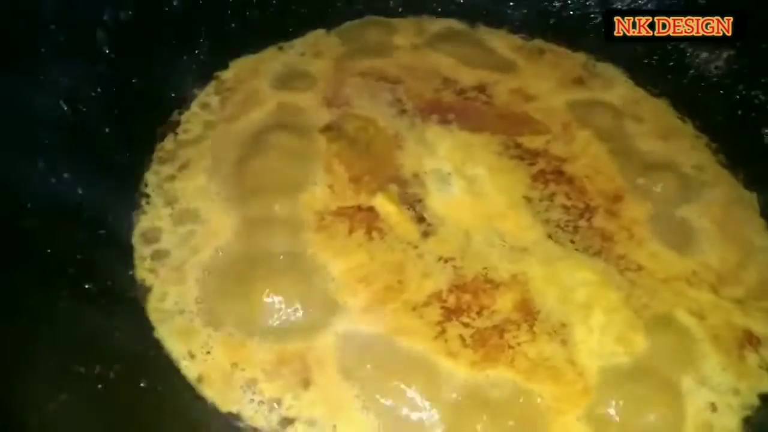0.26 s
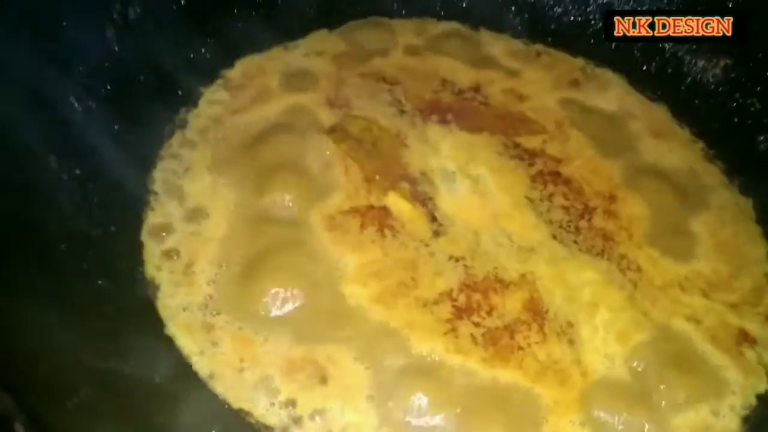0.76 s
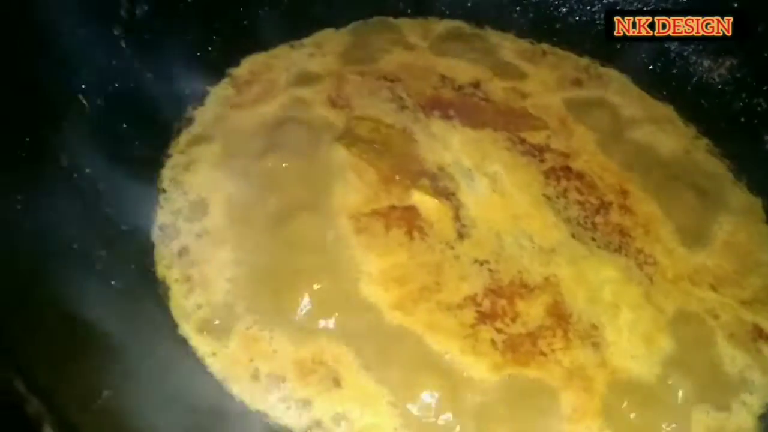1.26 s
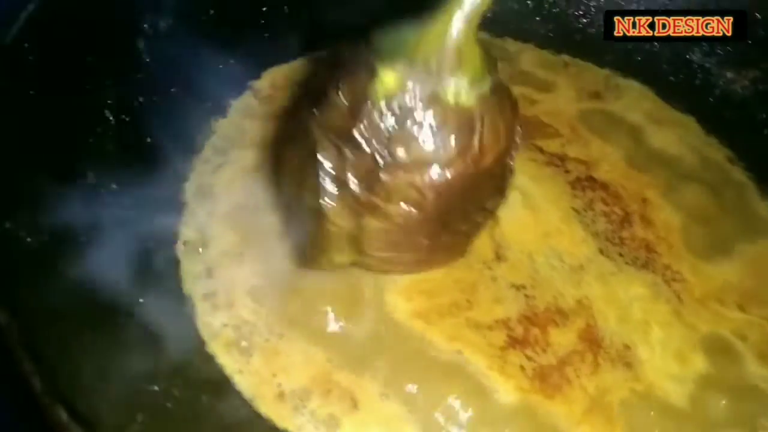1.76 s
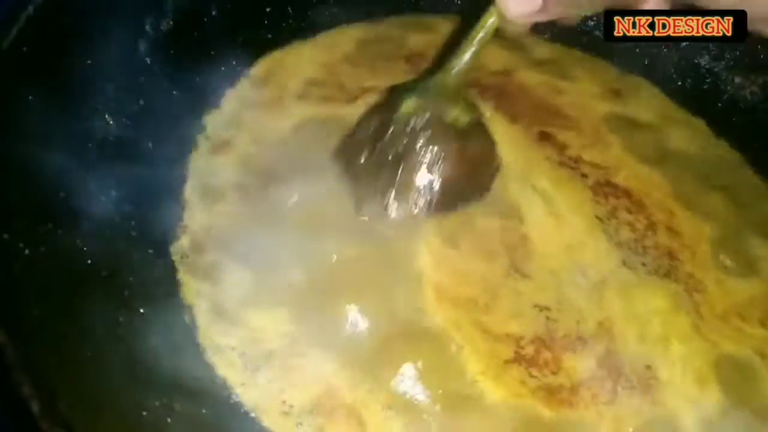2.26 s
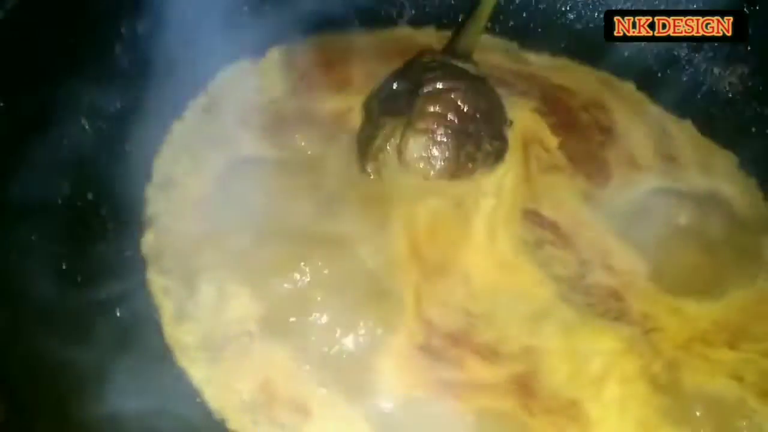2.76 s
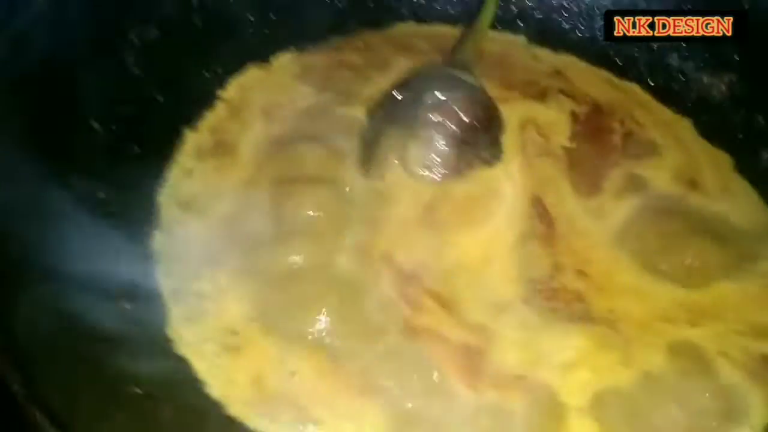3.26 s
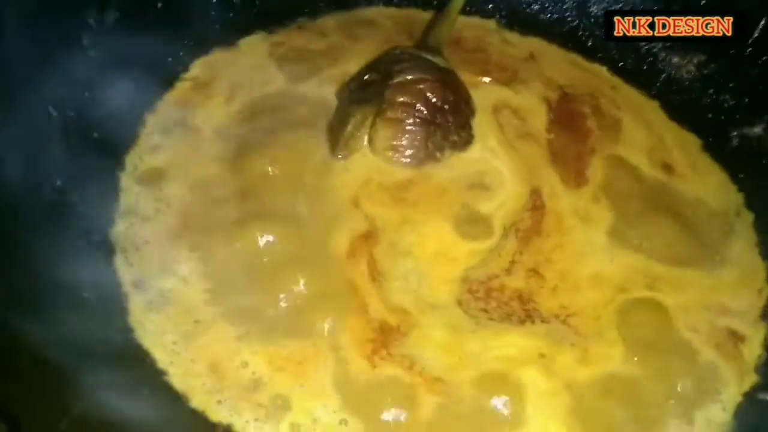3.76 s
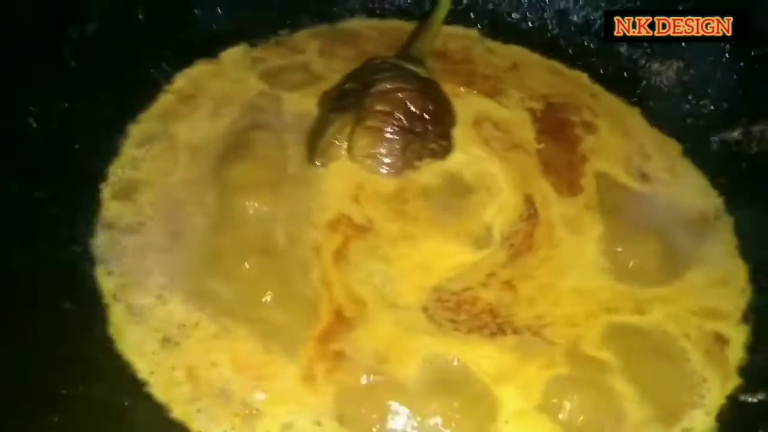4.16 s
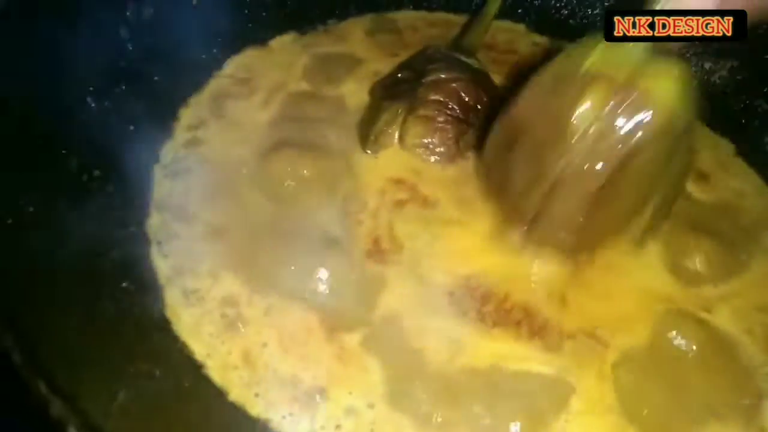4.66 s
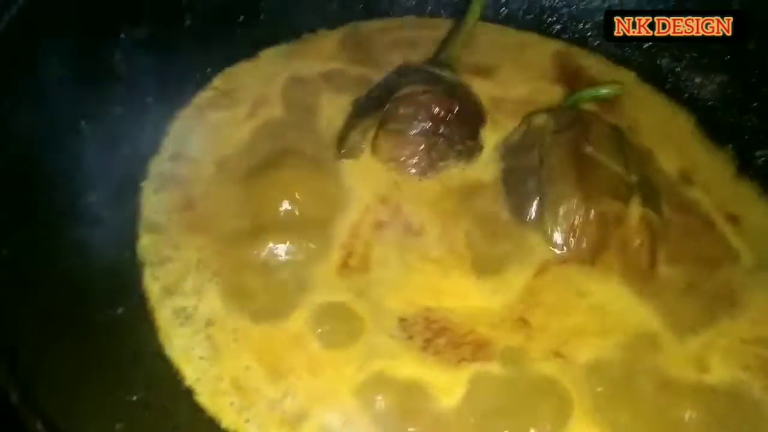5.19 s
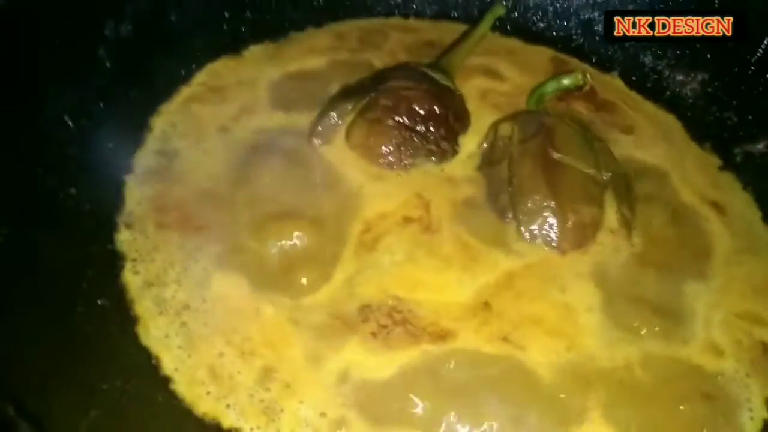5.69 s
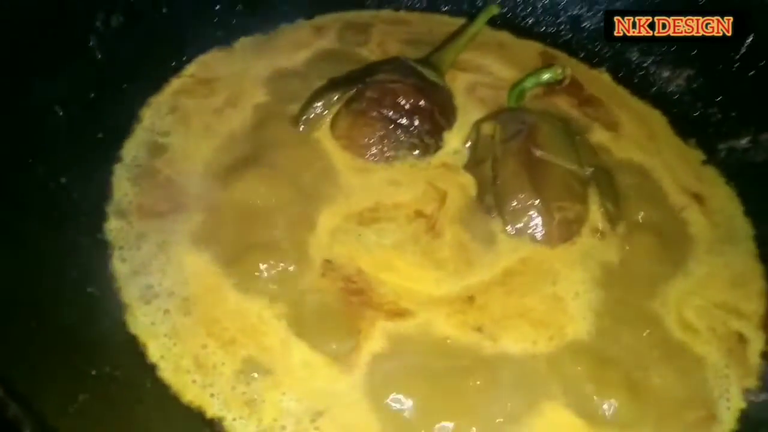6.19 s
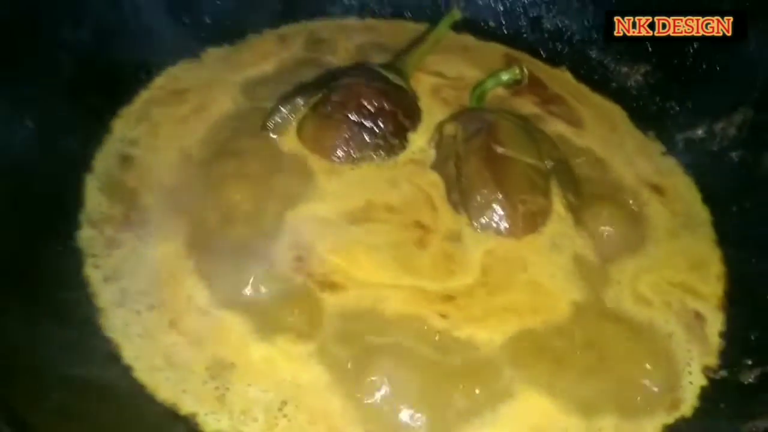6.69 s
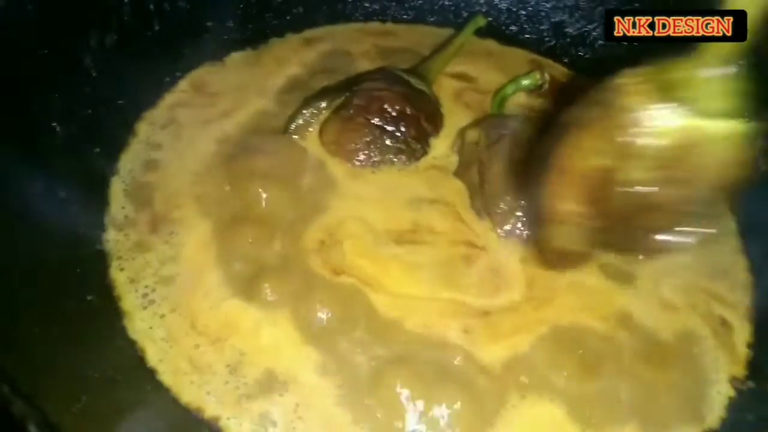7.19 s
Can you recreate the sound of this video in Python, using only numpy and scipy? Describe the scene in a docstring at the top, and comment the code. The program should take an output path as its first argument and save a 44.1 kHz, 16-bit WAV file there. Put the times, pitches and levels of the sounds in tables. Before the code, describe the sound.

Thick curry bubbles, plops and sizzles in a pan, with sharp oil spits and steady dull pounding from another room.

```python
"""Curry simmering in a wide pan

Close up, steam gurgles and plops through thick gravy while oil sizzles and spits at the rim. The boil
slackens once a first aubergine has sunk in; a second lands with a wet slap and a rush of froth.
Elsewhere in the house steady pounding, as of a mortar and pestle, thuds through the floor, and later
a low rumble like a rolling grinding stone joins in."""
import sys
import numpy as np
from scipy import signal
from scipy.fft import rfft, irfft
from scipy.io import wavfile
from scipy.ndimage import uniform_filter1d

SR = 44100
rng = np.random.default_rng(int(sys.argv[2]) if len(sys.argv) > 2 else 0)


def persist_wave(psi):
    """Save psi, clipped to +-1, as 16-bit WAV."""
    counts = np.round(np.clip(psi, -1, 1) * 32767).astype(np.int16)
    wavfile.write(sys.argv[1], SR, np.atleast_2d(counts).T)


N = 328104
TIME = np.arange(N) / SR
# the aubergine lands and settles: start_s, peak_db
SLAP_HITS = [(5.3335, -26), (5.3454, -36), (5.3562, -35.5)]


def amp(db):
    """Decibels to gain."""
    return 10 ** (np.asarray(db) / 20)


def unit_rms(x):
    """Scales to rms 1."""
    return x / np.sqrt(np.mean(x ** 2) + 1e-20)


def unit_peak(x):
    """Scales to peak 1."""
    return x / (abs(x).max() + 1e-20)


def add(mix, start_s, sound):
    """Mixes a sound in at its start time."""
    part = mix[max(round(start_s * SR), 0):][:len(sound)]
    part += sound[:len(part)]


def eq(x, curve):
    """Minimum-phase EQ through points of freq_hz, gain_db."""
    size = 8192
    hz, db = np.transpose(curve)
    bin_hz = abs(np.fft.fftfreq(size, 1 / SR))
    log_gain = np.log(amp(np.interp(np.log(bin_hz + 1), np.log(hz + 1), db)))
    taps = np.fft.ifft(np.exp(np.conj(signal.hilbert(log_gain)))).real[:size // 2]
    return signal.oaconvolve(x, taps)[:len(x)]


def band(x, lo_hz, hi_hz, order=3):
    """Band-pass."""
    return signal.sosfilt(signal.butter(order, [lo_hz, hi_hz], "band", fs=SR, output="sos"), x)


def noise(samples, lo_hz, hi_hz, order):
    """A band of noise at rms 1."""
    return unit_rms(band(rng.standard_normal(samples), lo_hz, hi_hz, order))


def ring(t, hz, t60):
    """One dying mode."""
    return np.sin(2 * np.pi * hz * t) * np.exp(-np.log(1000) * t / t60)


def attack(t, rise_s):
    """An onset easing from 0 to 1."""
    return 1 - np.exp(-t / rise_s)


def swell(middle_s, length_s):
    """A smooth rise from 0 to 1 and back."""
    return np.cos(np.pi * np.clip((TIME - middle_s) / length_s, -.5, .5)) ** 2


def drift(rate_hz):
    """Smooth random wander of rms 1."""
    rolloff = 1 + (np.fft.rfftfreq(N, 1 / SR) / rate_hz) ** 2
    return unit_rms(irfft(rfft(rng.standard_normal(N)) / rolloff, N))


def reverb(x, t60):
    """Diffuse reflections that build up and die away."""
    t = np.arange(SR * 3 // 4) / SR
    tail = rng.choice([-1., 1.], len(t)) * np.exp(-np.log(1000) * t / t60) * attack(t, 0.037 * t60)
    return signal.oaconvolve(x, tail / np.linalg.norm(tail))[:N]


def room_tone():
    """A faint, dark bed of noise."""
    # spectrum of the quiet room: freq_hz, gain_db
    room_eq = [(20, -36), (60, 6.5), (105, 13), (170, 1), (350, -0.5), (600, -41), (1500, -58)]
    return amp(-77.5) * unit_rms(eq(rng.standard_normal(N), room_eq))


def grinding_stone():
    """Uneven stone rolling on stone shakes the floor in lumps, and grates when pushed hard."""
    # effort behind the stone: time_s, level_db
    effort = [(4.351, -66), (4.56, -43), (4.8, -40.5), (5.03, -44.5), (5.45, -38.5), (6.12, -41.5),
              (6.5, -47.5), (6.9, -41), (7.44, -45.5)]
    # the floor's low resonance: freq_hz, gain_db
    floor_eq = [(20, -80), (45, -16.5), (62, -15), (76, -7), (87, -12.5), (104, 7.5), (118, -5.5),
                (145, -9), (180, -18.5), (260, -35.5), (310, -45), (450, -53), (900, -103)]
    effort_db = np.interp(TIME, *np.transpose(effort), left=-120)
    rumble = unit_rms(eq(rng.standard_normal(N), floor_eq))
    rumble /= np.sqrt(uniform_filter1d(rumble ** 2, SR // 5) + 0.025)  # the stone's weight steadies it
    grit = amp(-23.5 + 3.5 * (effort_db - effort_db.max())) * noise(N, 275, 288, order=2)
    lumps_db = 1.8 * np.clip(drift(rate_hz=8), -2.5, 1.0)
    return amp(lumps_db + effort_db) * (rumble + grit)


def pounding():
    """Each blow thuds in the floor and knocks in the mortar; the house booms and clatters after it."""
    # pestle blows: start_s, thud_db, knock_db, clack_db
    blows = [(0.284, -33, -47, -70), (0.68, -36, -33, -54), (1.095, -34.5, -36.5, -48.5),
             (1.503, -36.5, -39.5, -50), (1.881, -33, -39, -49), (2.271, -35, -37.5, -53),
             (2.633, -38, -46, -48.5), (3.024, -30.5, -42, -49.5), (3.416, -36, -57, -57),
             (3.816, -31, -37, -56), (4.229, -30.5, -38, -56), (4.611, -32.5, -40.5, -45.5),
             (5.004, -25.5, -42.5, -46.5), (5.417, -29.5, -35, -75), (5.831, -25, -43.5, -56.5),
             (6.23, -24.5, -39, -78), (6.643, -29.5, -40.5, -45), (7.066, -28.5, -43, -58.5)]
    # modes of mortar and floor: pitch_hz, level_db, t60_s
    knock_modes = [(210, -34, 0.02), (234.3, 12, 0.12), (294, 3, 0.042), (329, 16.5, 0.038),
                   (383, -30, 0.034), (483, -10.5, 0.21), (650, -4, 0.046)]
    # boom of the house: freq_hz, gain_db
    house_eq = [(25, -62), (55, -2), (80, -5.5), (105, -3), (145, 2.5), (190, -6.5), (400, -2.5),
                (1500, -39)]
    mix, t = np.zeros(N), np.arange(SR * 3 // 4) / SR
    for start_s, thud_db, knock_db, clack_db in blows:
        floor_hz = 108.4 * (1 + 0.064 * rng.uniform(-1.3, 1))
        give = 1 - np.exp(-(t / 0.0041) ** 2)  # the floor takes a moment to yield
        thud = -amp(thud_db) * unit_peak(band(ring(t, floor_hz, 0.074) * give, 61, 480, order=1))
        knock = sum(amp(db) * ring(t, hz * rng.uniform(1, 1.04), t60) for hz, db, t60 in knock_modes)
        contact = rng.standard_normal(len(t)) * np.exp(-t / .008) * attack(t, .0012)
        clack = unit_peak(band(contact, 1000, 1380))
        clatter = noise(len(t), 145, 376, order=2) * np.exp(-t / 0.041) * attack(t, 0.0032)
        standing_wave = ring(t, 246, 0.2) * attack(t, 0.0091)  # between two walls
        loose_rattle = noise(len(t), 387, 820, order=3) * np.exp(-t / 0.032) * attack(t, 0.0018)
        add(mix, start_s - .003, thud)
        add(mix, start_s, amp(knock_db) * (unit_peak(knock) + amp(-11.5) * clatter))
        add(mix, start_s, amp(clack_db) * clack)
        add(mix, start_s, amp(-3) * eq(reverb(thud, t60=0.38), house_eq))
        add(mix, start_s, amp((thud_db + knock_db) / 2 - 11) * standing_wave)
        add(mix, start_s, amp(thud_db - 38) * loose_rattle)
    return mix


def vigour():
    """How hard the curry boils at each moment, in dB."""
    # the boil slackens once the first aubergine has sunk in: time_s, level_db
    boil_curve = [(0.0, -0.5), (0.45, -0.5), (0.72, .5), (1.0, 0.5), (1.75, 0), (2.1, -0.5), (2.6, -.5),
                  (2.82, -4.5), (3.25, -2.5), (3.6, -4), (4.15, -3), (5.3, -4), (6.05, -5.5), (6.7, -3),
                  (7.15, -3.5), (7.44, -5)]
    return np.interp(TIME, *np.transpose(boil_curve))


def lulls():
    """Two level rides in dB: one for the sizzle, one for the gurgling."""
    # brief dips and swells: middle_s, length_s, sizzle_db, gurgle_db
    rides = [(0.082, 0.21, -0.5, -10), (1.043, 0.29, 1, -9.5), (2.863, 0.22, 3, -5), (3.107, 0.31, 0.5, 10),
             (3.566, 0.16, 1, -10), (4.75, 0.33, -5.5, -9), (5.42, 0.21, 1.5, 4), (5.835, 0.1, -1.5, 5),
             (7.296, 0.27, -2, -21)]
    return sum(np.outer(changes, swell(middle_s, length_s)) for middle_s, length_s, *changes in rides)


def bubbles(lo_hz, hi_hz, per_s, spread_db, cycles, wash_db, clump_db):
    """Tiny bursts, each ringing at the pitch of its size, over the wash of countless fainter ones."""
    # spectrum of the boil: freq_hz, gain_db
    boil_eq = [(300, -48.5), (430, 2), (520, 4.5), (780, 11.5), (1020, 5.5), (1300, -5.5), (1960, -7.5),
               (3100, -5.5), (4000, -7), (7200, -3), (8600, -8), (11200, -11.5), (13500, -20), (15500, -22)]
    swarm, t = np.zeros(N), np.arange(2048) / SR
    pitches = np.geomspace(lo_hz, hi_hz, 20)
    count = int(per_s * N / SR / len(pitches))
    for hz in pitches:
        onsets = rng.integers(0, N, count)
        gains = amp(spread_db * np.minimum(rng.exponential(1, count), 4.5))
        bursts = np.bincount(onsets, gains * rng.choice([-1, 1], count), N)
        swarm += signal.oaconvolve(bursts, hz * ring(t, hz, cycles / hz))[:N]
    texture = unit_rms(band(swarm, lo_hz, hi_hz)) + amp(wash_db) * noise(N, lo_hz, hi_hz, order=4)
    clumps = amp(clump_db * drift(rate_hz=48))
    return unit_rms(eq(texture, boil_eq) * clumps)


def gurgle(hz, t60):
    """One slow bubble: a soft tone that swells, glides and dies, wobbling as its thick skin moves."""
    t = np.arange(SR // 6) / SR
    wobble = noise(len(t), 15, 80, order=2)
    glide = 1 + rng.uniform(-.5, .8) * t
    tone = ring(t * glide + wobble / (22 * hz), hz, t60)
    return unit_peak(t * tone * (1 + .25 * wobble[::-1]))


def simmer():
    """Steam wells up through thick gravy: overlapping gurgles over a soft churn, and single big ones."""
    # big slow bubbles: start_s, peak_db, pitch_hz
    big_gurgles = [(2.91, -57.5, 794), (3.146, -58, 516), (3.349, -56.5, 800), (3.451, -56.5, 860),
                   (3.724, -57, 568), (4.45, -60.5, 685), (5.332, -55.5, 816), (5.888, -61, 548),
                   (5.964, -61.5, 830), (6.351, -56.5, 820), (6.534, -60, 784), (6.755, -62, 790),
                   (6.93, -55.5, 750), (7.31, -59, 734)]
    # hollow resonances of the gravy and the air over it: freq_hz, gain_db
    gravy_eq = [(300, -7), (440, -7), (510, 2), (600, -6), (680, -2.5), (750, 1), (790, -2.5), (845, 2.5),
                (930, -10.5), (1500, -14)]
    swarm, big = np.zeros(N), np.zeros(N)
    for when, size, pitch, length in rng.random((460, 4)):
        bubble = gurgle(hz=490 + 380 * pitch ** .7, t60=.045 + .07 * length)
        add(swarm, when * N / SR, amp(17 * size) * bubble)
    swarm = amp(-61.5 + 2.76 * vigour()) * unit_rms(swarm)
    for start_s, db, hz in big_gurgles:
        add(big, start_s - .004, amp(db) * gurgle(hz, t60=.085))
    churn = bubbles(455, 868, per_s=220, spread_db=2, cycles=7.7, wash_db=10.5, clump_db=2.5)
    churn *= amp(-61.5 + 4.9 * vigour())  # fades fastest as the boil slackens, so gurgles stand out
    _, ride_db = lulls()
    return eq(amp(ride_db) * (swarm + churn), gravy_eq) + big


def frying_gain(hz, bed_db, follow):
    """Gain of one bubble size: a bed that follows the boil, plus the flares near its pitch."""
    # patches of oil at the rim flare up and die down: middle_s, length_s, level_db, pitch_hz
    flares = [(0.0, 0.31, -55, 7600), (0.9, 0.39, -56.5, 7150), (1.507, 0.59, -50.5, 7400),
              (1.896, 0.76, -50.5, 6400), (2.54, 0.62, -55.5, 5750), (3.666, .35, -63.5, 5200),
              (4.033, 0.53, -62.5, 6230), (5.12, .25, -55, 6300), (5.57, 0.41, -55.5, 6740),
              (6.243, 0.61, -62, 5700), (6.705, 0.62, -56, 5900), (7.44, .12, -58.5, 5400)]
    spread_octaves = 0.31  # range of bubble sizes within one patch
    power = amp(bed_db + follow * vigour()) ** 2
    for middle_s, length_s, flare_db, flare_hz in flares:
        nearness = np.exp(-(np.log2(hz / flare_hz) / spread_octaves) ** 2)
        power += amp(flare_db) ** 2 * swell(middle_s, length_s) * nearness
    return np.sqrt(power)


def splash_gain():
    """Gain of the froth as gravy displaced by the aubergine meets hot metal."""
    rise_s, fall_from_s, fall_s = 0.16, 0.32, 0.079
    t = TIME - SLAP_HITS[0][0]
    return amp(-64.5) * np.clip(t / rise_s, 0, 1) * np.exp(-np.maximum(t - fall_from_s, 0) / fall_s)


def shimmer(x, depth_db):
    """Narrow bands of the sound swell and fade at random, least in the finest hiss."""
    hz, frame_s, spectrum = signal.stft(x, SR, nperseg=1024, noverlap=768)

    def patches(bins, frames):
        field = uniform_filter1d(rng.standard_normal(spectrum.shape), bins, axis=0)
        field = uniform_filter1d(field, frames, axis=1)
        return unit_rms(uniform_filter1d(field, frames // 2, axis=1))

    wander = patches(bins=3, frames=22) + 0.54 * patches(bins=16, frames=14)
    depth = np.interp(frame_s, TIME, depth_db) * np.interp(hz, [0, 7500, 10000], [1, .95, .35])[:, None]
    spectrum *= amp(depth * np.clip(wander, -2.5, 1.7) - depth ** 2 / 11)
    return signal.istft(spectrum, SR, nperseg=1024, noverlap=768)[1][:N]


def sizzle():
    """Five sizes of bubble, from bursting froth up to steam fizz."""
    froth = bubbles(1178, 2846, per_s=400, spread_db=3.5, cycles=99, wash_db=3.5, clump_db=2.5)
    froth *= amp(-60 + 1.67 * vigour()) + splash_gain()
    crackle = bubbles(3010, 4900, per_s=950, spread_db=1.5, cycles=4.8, wash_db=-1, clump_db=2.5)
    crackle *= frying_gain(4200, bed_db=-62.5, follow=0.96) + amp(1) * splash_gain()
    coarse = bubbles(4680, 6350, per_s=730, spread_db=2.5, cycles=26, wash_db=-1, clump_db=2.1)
    coarse *= frying_gain(5030, bed_db=-60, follow=0.62)
    fine = bubbles(6470, 8600, per_s=1100, spread_db=5, cycles=18, wash_db=1.5, clump_db=2)
    fine *= frying_gain(6870, bed_db=-59, follow=4.4)
    fizz = bubbles(8330, 15400, per_s=1900, spread_db=6.5, cycles=15, wash_db=2, clump_db=1.65)
    fizz *= frying_gain(10500, bed_db=-57, follow=0.55)
    ride_db, _ = lulls()
    # narrow bands of the sizzle swell and fade more deeply when it is quieter
    shimmer_depth_db = np.clip(3 - 1.15 * vigour(), 2.5, 6.5)
    return shimmer(fizz + amp(ride_db) * (froth + crackle + coarse + fine), shimmer_depth_db)


def plops():
    """The thick skin of a large bubble parts softly and the cavity rings briefly, rising as it opens."""
    # large gravy bubbles bursting: start_s, peak_db, pitch_hz
    bursts = [(0.73, -43, 2070), (0.7574, -42, 2670), (0.8934, -38.5, 1530), (1.131, -42.5, 1900),
              (1.2327, -37.5, 1500), (1.5121, -37, 1530), (1.6087, -41.5, 1280), (2.3775, -42.5, 1310),
              (2.4452, -43.5, 3110), (2.912, -45, 1380), (4.0734, -50.5, 1600), (4.1046, -44, 1680),
              (4.8808, -47.5, 1910), (5.4301, -42.5, 2030), (5.465, -44, 2060), (5.5886, -37, 2320),
              (5.612, -44, 2460), (6.7563, -40.5, 1130)]
    mix, t = np.zeros(N), np.arange(1500) / SR
    for start_s, db, hz in bursts:
        tear = unit_peak(noise(len(t), 480, 4000, order=2) * np.exp(-t / .004))
        cavity = ring(t * (1 + 6 * t), hz, t60=0.011)
        add(mix, start_s - .0005, amp(db) * unit_peak(attack(t, .0005) * (cavity + amp(-8) * tear)))
    return mix + amp(-3.5) * reverb(mix, t60=0.098)


def oil_spits():
    """A droplet flashes to steam with a crack and a high ping, echoes off the pan, then fries away."""
    # sharp spits of oil: start_s, ping_db, pitch_hz, crack_db
    loud_spits = [(0.7105, -31.5, 4450, -21.5), (1.227, -35.5, 8600, -53), (1.7952, -30, 6840, -44),
                  (1.8237, -30, 6880, -44), (1.937, -33, 5500, -55), (2.0474, -32, 6950, -48),
                  (2.476, -32, 6350, -36), (2.5305, -30.5, 6700, -48), (3.273, -34, 6100, -54),
                  (3.604, -38, 7200, -40), (3.9538, -29, 6800, -62), (4.0067, -26.5, 6700, -59),
                  (4.124, -31.5, 5800, -60), (4.1915, -34, 6500, -46), (4.4776, -36.5, 6400, -39),
                  (4.4983, -32, 6400, -55), (4.8141, -36.5, 8500, -64), (4.88, -44, 7500, -20.5),
                  (5.0035, -40, 8250, -40), (5.121, -33.5, 6900, -49), (5.537, -39, 7200, -39),
                  (5.5883, -34.5, 7360, -39), (5.877, -36, 7200, -27), (5.914, -34.5, 6240, -54),
                  (6.0895, -33, 5900, -64), (6.404, -32.5, 7060, -64), (6.5353, -33, 8400, -62),
                  (6.647, -32, 6600, -57), (6.749, -35, 7350, -43), (6.836, -34.5, 7200, -39),
                  (7.1324, -28.5, 6520, -50)]
    # reflections off the pan wall: nominal_delay_s, level_db
    wall_echoes = [(.0012, -11), (.0017, -12), (.0031, -4.5)]
    faint_per_s = 4
    faint_spits = [(when * N / SR, -47 + 6 * size, 5500 + 3600 * pitch, -59)
                   for when, size, pitch in rng.random((int(faint_per_s * N / SR), 3))]
    mix, t = np.zeros(N), np.arange(4000) / SR
    pulse_age = t * SR / 1.6  # a one-sided pulse, 1.6 samples wide
    crack = unit_peak(band((1 - pulse_age) * np.exp(-pulse_age), 2300, 11500, order=2))
    for start_s, ping_db, hz, crack_db in loud_spits + faint_spits:
        ping = unit_peak(ring(t, hz, t60=.0018) * attack(t, .0001))
        pop = amp(ping_db) * ping + amp(crack_db) * crack
        add(mix, start_s, pop)
        for delay_s, echo_db in wall_echoes:
            add(mix, start_s + delay_s * rng.uniform(0.48, 1.3), amp(echo_db) * pop)
        fry = noise(len(t), 1.02 * hz, 1.1 * hz, order=1) * np.exp(-t / 0.0093)
        add(mix, start_s, amp(ping_db - 14) * fry)
    return mix


def aubergine():
    """A wet slap against the pan, with a short spatter after it."""
    # spectrum of the slap: freq_hz, gain_db
    slap_eq = [(100, -23), (400, -6), (750, -9.5), (1000, -22), (1400, -7), (2100, 4), (2900, -10),
               (4000, -6), (5700, -4), (8000, -9), (11000, -38), (15000, -39)]
    mix, t = np.zeros(N), np.arange(4000) / SR
    for start_s, db in SLAP_HITS:
        spatter = rng.standard_normal(len(t)) * (np.exp(-t / 0.0089) + np.exp(-t / 0.013))
        spatter[0] += 9  # the click of first contact
        add(mix, start_s, amp(db) * unit_peak(eq(spatter, slap_eq)))
    return mix


def scene():
    """The pan is close and nearly dry; the low sounds come through the house."""
    # echoes between gravy and pan wall lift or cancel narrow bands: centre_hz, width_hz, gain_db
    pan_bands = [(1054, 196, -24.5), (1332, 99, 4.5), (1464, 18, 7), (1528, 17, -5.5), (1740, 23, 3.5),
                 (1890, 97, -8), (1992, 13.3, 3.5), (2224, 20, 0), (2700, 18, -1), (3507, 120, -19),
                 (3830, 37, 7), (5212, 102, 3), (7480, 70, -10)]
    hz = np.geomspace(100, 16000, 900)
    ripple_db = sum(db * np.exp(-((hz - centre) / width) ** 2) for centre, width, db in pan_bands)
    pops = oil_spits() + plops() + aubergine()
    wash = eq(sizzle() + amp(-7) * reverb(pops, t60=0.39), np.c_[hz, ripple_db])
    return (room_tone() + grinding_stone() + pounding() + simmer() + wash + pops)[None]


def record(dry):
    """A small microphone sheds the deepest bass, and the very top is cut off."""
    low_cut_hz, high_cut_hz = 30, 15700
    thin = signal.sosfilt(signal.butter(1, low_cut_hz, "high", fs=SR, output="sos"), dry)
    low_pass = signal.firwin(511, high_cut_hz, window=("kaiser", 9), fs=SR)
    return signal.oaconvolve(thin, low_pass[None], "same")


dry = scene()
out = record(dry)
persist_wave(out)
```